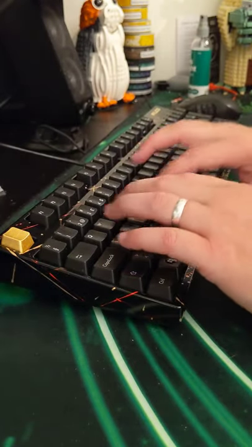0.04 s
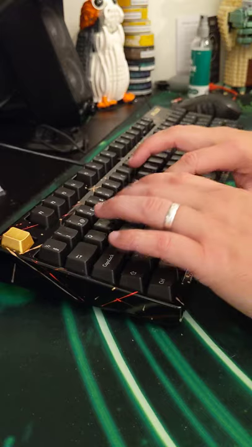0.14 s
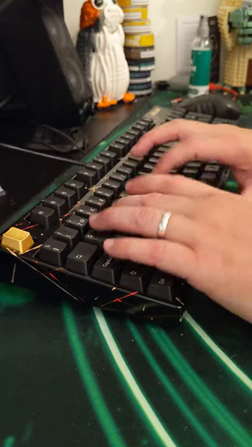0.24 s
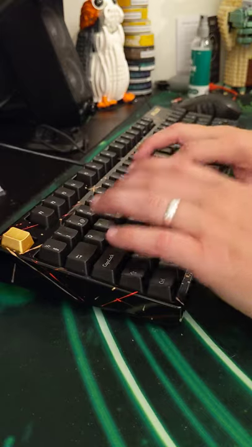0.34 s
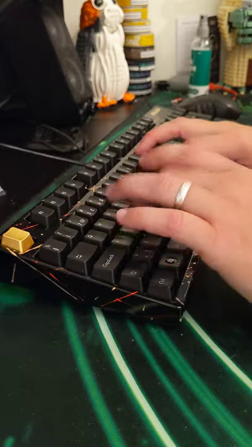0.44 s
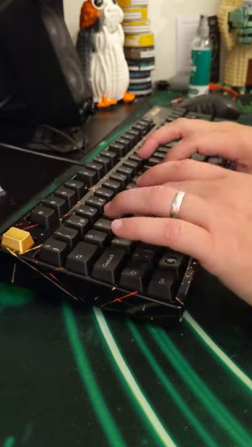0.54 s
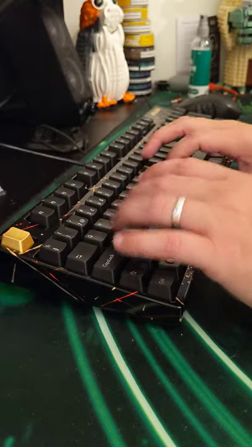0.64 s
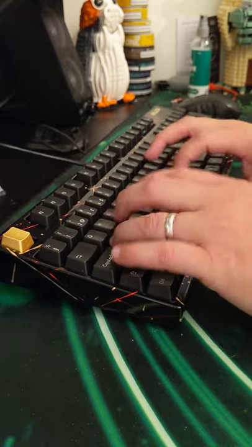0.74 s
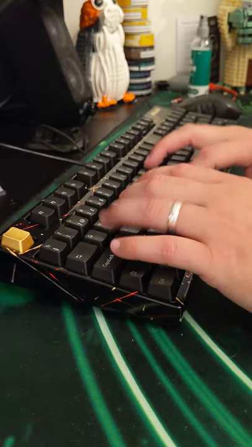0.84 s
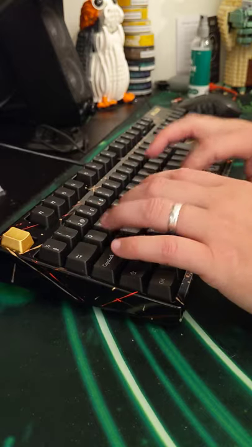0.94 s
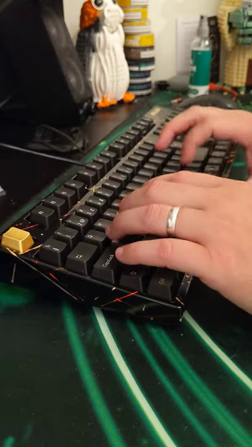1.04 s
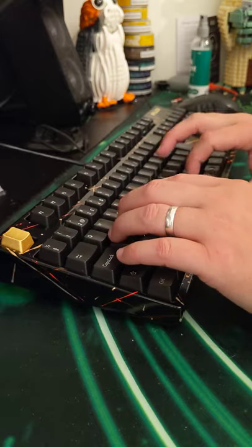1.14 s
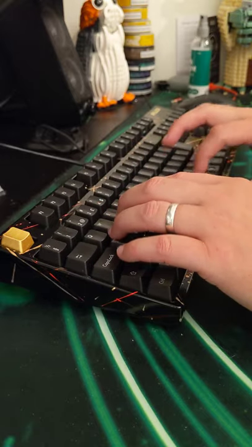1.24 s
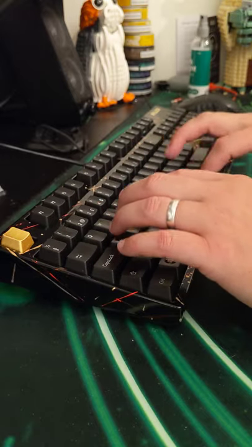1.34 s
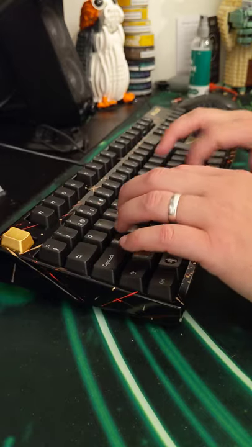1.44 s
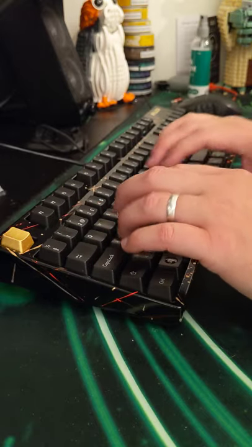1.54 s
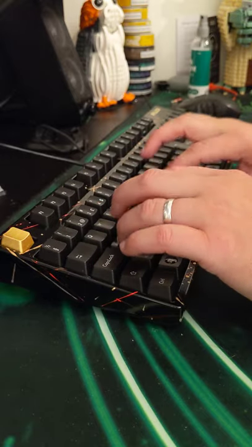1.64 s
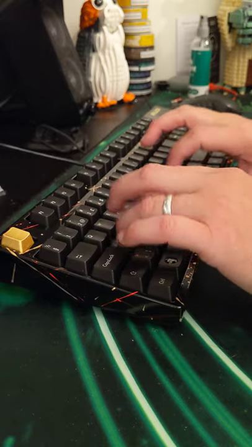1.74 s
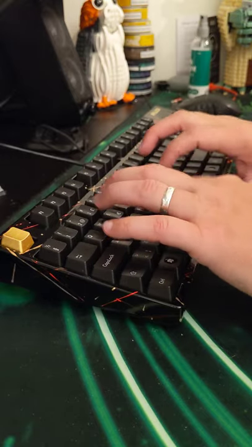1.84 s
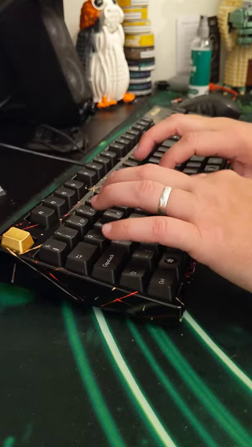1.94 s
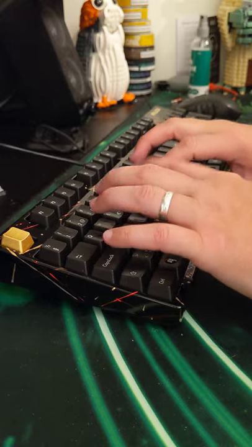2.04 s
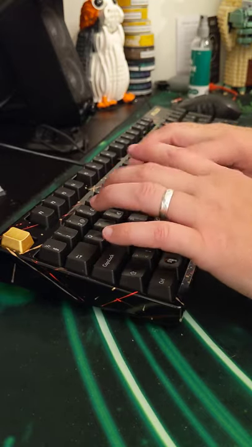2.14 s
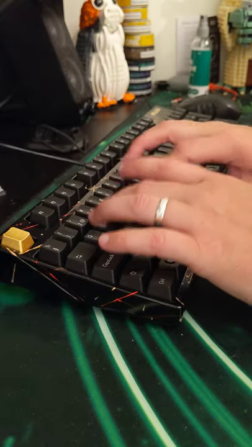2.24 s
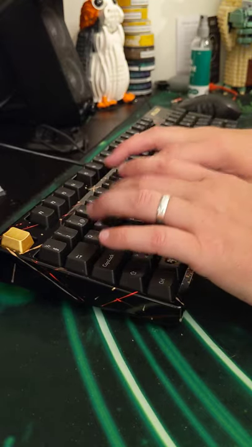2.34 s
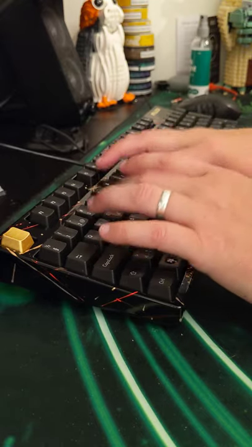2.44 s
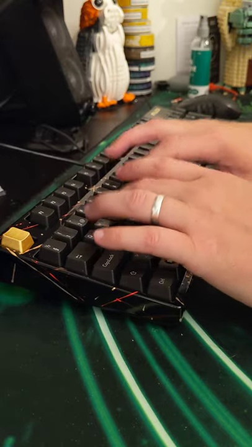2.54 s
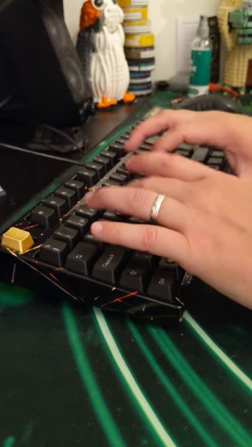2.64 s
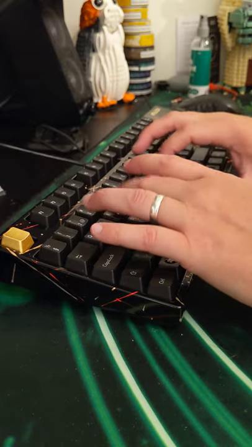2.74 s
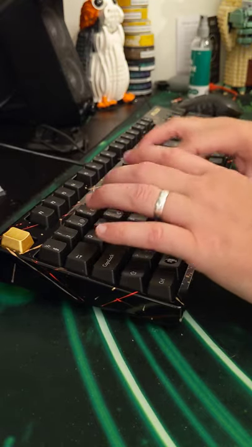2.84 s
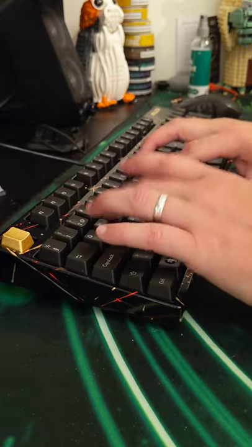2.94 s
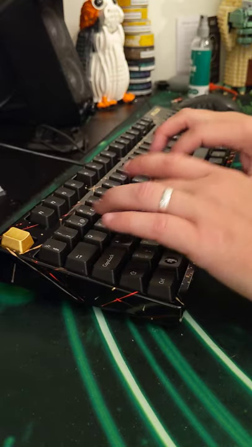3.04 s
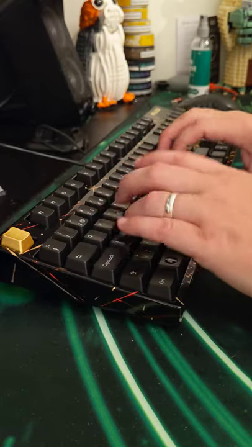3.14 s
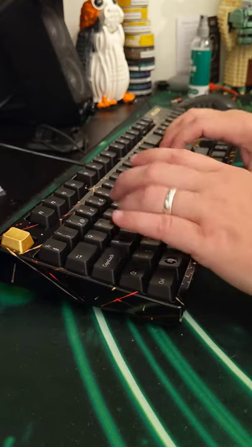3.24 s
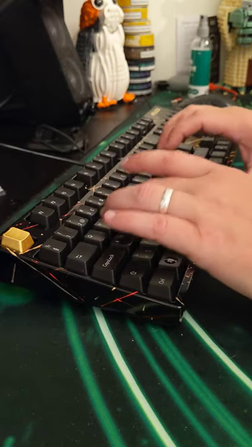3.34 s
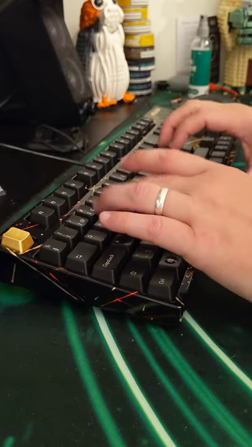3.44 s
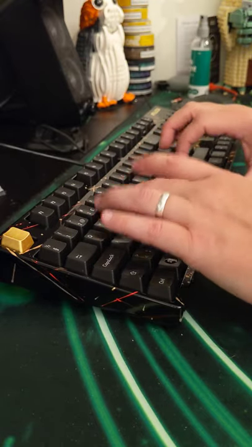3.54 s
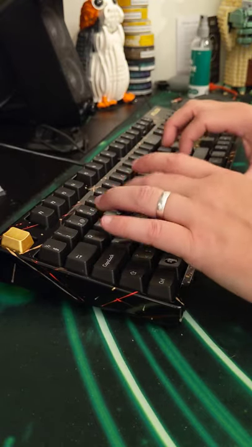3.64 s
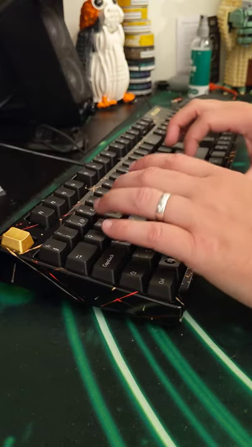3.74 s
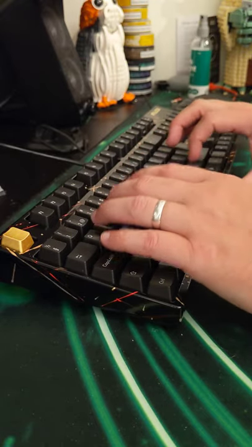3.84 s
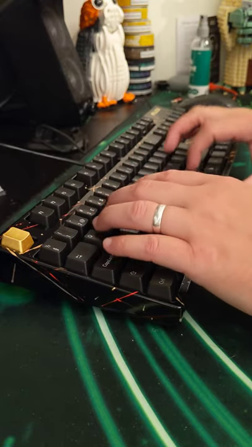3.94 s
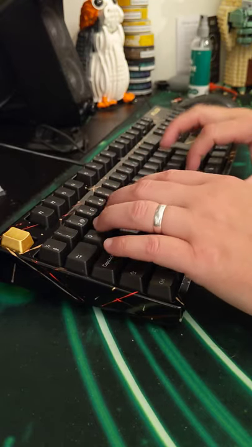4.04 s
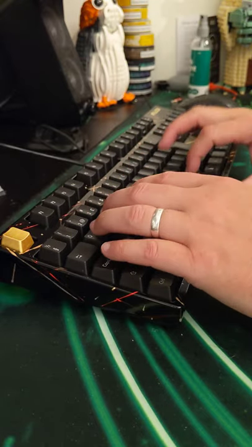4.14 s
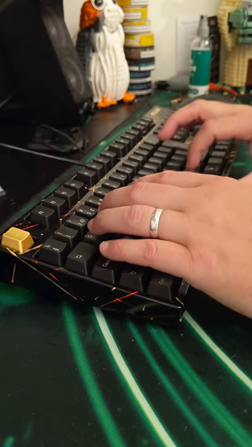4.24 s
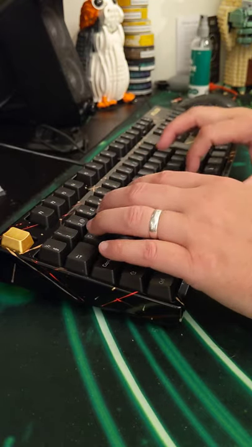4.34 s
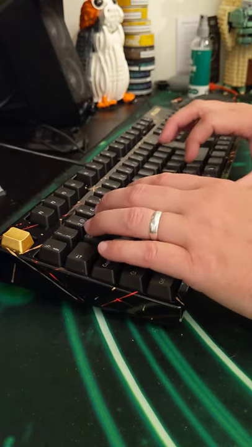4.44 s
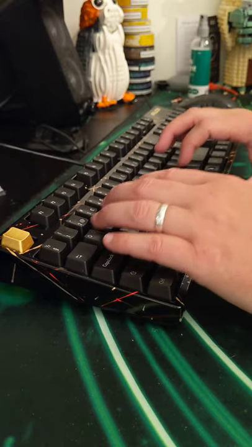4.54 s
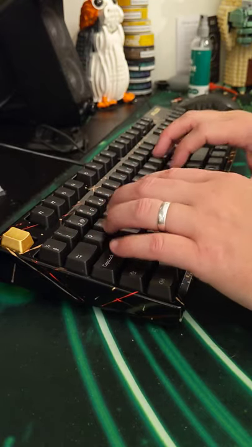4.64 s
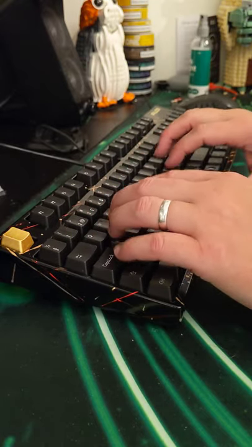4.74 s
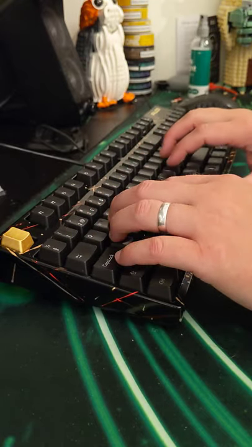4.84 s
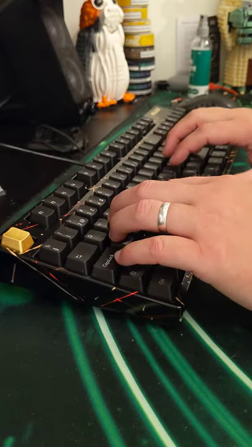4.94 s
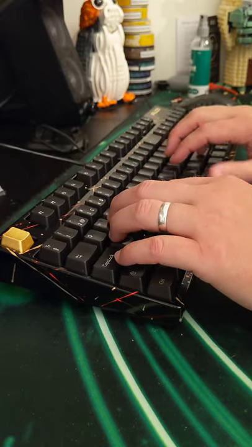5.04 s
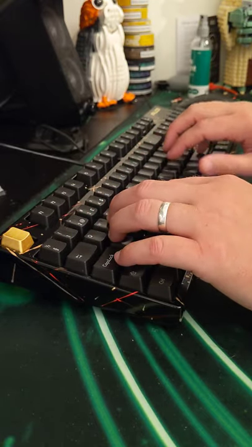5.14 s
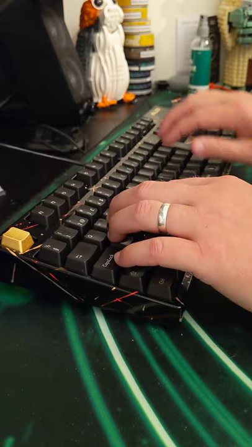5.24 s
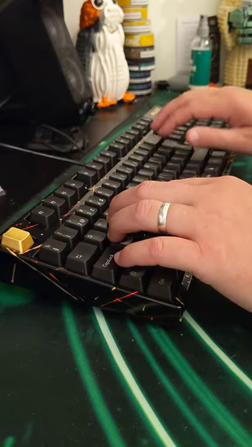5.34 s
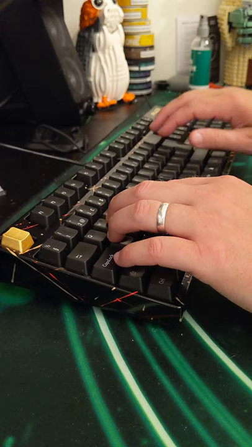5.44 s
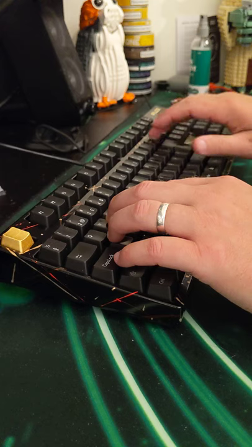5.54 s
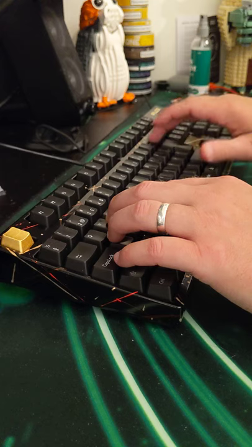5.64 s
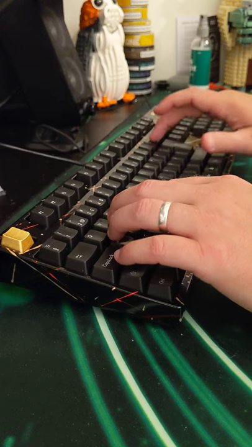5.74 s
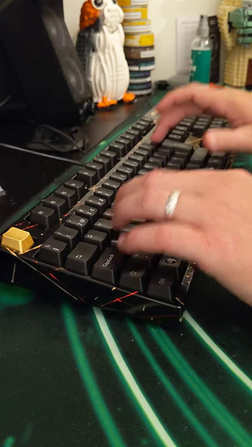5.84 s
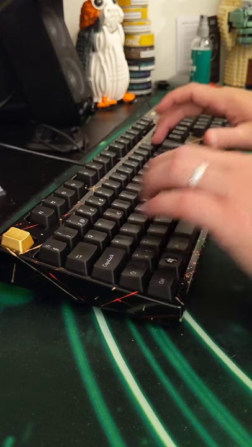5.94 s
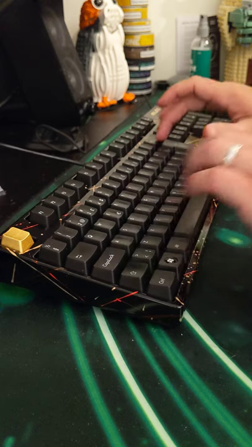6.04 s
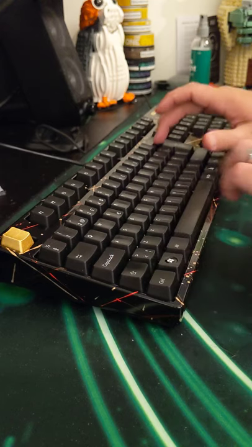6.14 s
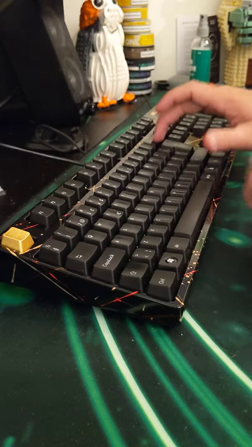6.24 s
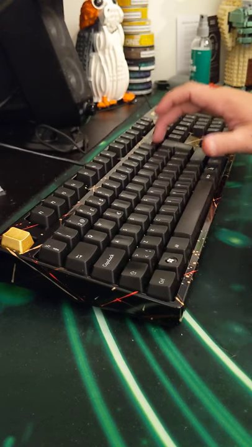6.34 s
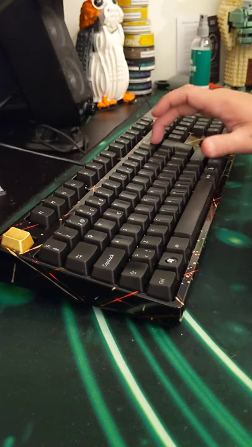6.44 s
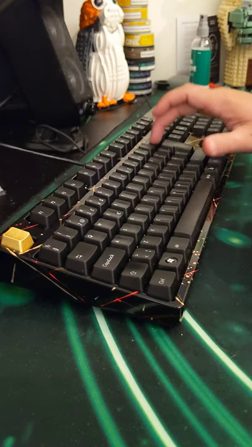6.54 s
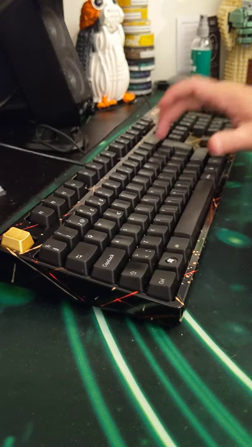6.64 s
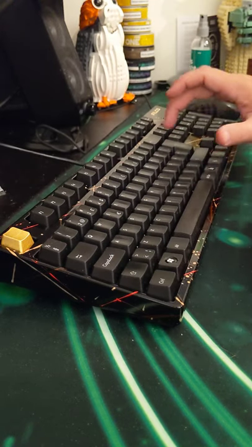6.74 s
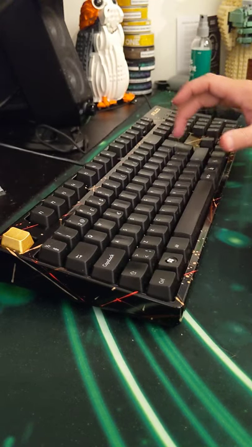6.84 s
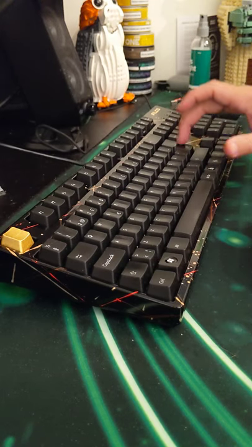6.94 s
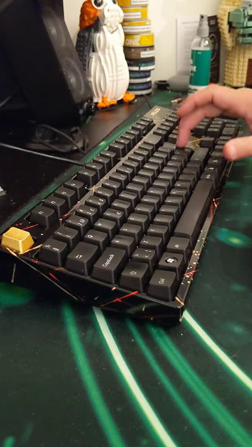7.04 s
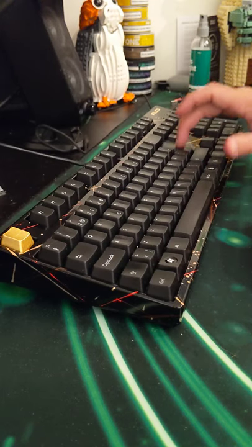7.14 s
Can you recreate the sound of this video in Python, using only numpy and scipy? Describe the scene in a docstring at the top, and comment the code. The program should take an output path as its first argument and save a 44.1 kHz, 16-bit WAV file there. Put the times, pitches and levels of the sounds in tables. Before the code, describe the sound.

A mechanical keyboard on a desk is typed close to a stereo microphone in a small room. From about 0.2 s crisp plastic clacks follow each other quickly and unevenly, presses and lighter spring-back clicks alternating. The space bar strikes lower and heavily at 1.4-1.5 s, again strongest around 2.1 s. Dense bursts fill 1.7-3.8 s, with bright cap rings, faint fingertip brushing, small nail ticks and low desk thumps. From 4.1 to 4.5 s only a soft bump and three separate key releases over cushioned presses, then two softer space-bar contacts near 4.6 s. A quiet second follows, with low rumble, faint hiss and hum. A light bump at 5.7 s leads to four spaced presses of a large far key, at 5.9, 6.1, 6.4 and 6.7 s, dull and deep, each with a quick return, the last loudest. Near silence ends it, with one barely audible touch at 7.1 s.

```python
"""Fast typing on a mechanical keyboard

The keyboard stands on a desk, close to a stereo microphone in a small room. Each key contact is a noise burst
that excites the resonances of board, plate, case, keycap and switch, in shares set by its force and snap.
The space bar and a large key at the far end sound deeper, and contacts ring the desk top as a low thump.
Fingertips brush the caps as filtered noise and nails tick; beneath lie rumble, hiss, hum and a fading ring."""
import sys
import numpy as np
from scipy import signal
from scipy.fft import rfft, irfft, next_fast_len
from scipy.io import wavfile
from scipy.ndimage import map_coordinates

SR = 44100
rng = np.random.default_rng(int(sys.argv[2]) if len(sys.argv) > 2 else 0)


def output_pcm(signal):
    """Save a mono or channel-first signal as 16-bit PCM at the path in sys.argv[1].

    Samples are clipped to [-1, 1] before scaling.
    """
    pcm = np.clip(np.atleast_2d(signal).T, -1, 1) * 32767
    wavfile.write(sys.argv[1], SR, np.round(pcm).astype(np.int16))


N = 316638  # samples in the scene
LENGTH = 16384  # samples in one hit
LEAD_S = .012  # time within a contact before it lands
TIME = np.arange(LENGTH) / SR
HZ = np.fft.rfftfreq(LENGTH, 1 / SR)

# small-key contacts, mostly letter presses, with faint finger touches, the last two on the far key;
# snap is high if crisp and low if cushioned: start_s, force_db, snap_db, keycap_ring_db
SMALL_CONTACTS = [(0.1707, -16, 4, -12), (0.1953, 1, -1.5, 2), (0.3137, 2.5, -1.5, -2), (.454, 0.5, -6, 0),
                  (0.564, -4.5, 2.5, -2.5), (0.5986, 3.5, 0.5, 2.5), (.814, 3.5, -1.5, 3),
                  (0.9613, 4, -5, -7), (1.204, -10, 1.5, -6), (1.2338, 2, -8.5, -2), (1.6951, -13, 0.5, -5),
                  (1.7254, -8, -4, -1.5), (1.7831, 0.5, -4.5, -1.5), (1.8197, -1.5, 5, 0),
                  (1.8731, 5.5, 3.5, 2.5), (1.978, 3, -6, 1), (2.0805, -1.5, -0.5, -1), (2.2608, 1, -2, 0),
                  (2.3328, -9, -8, -6), (2.3654, 0.5, -1.5, 1), (2.444, 2.5, 4.5, 7.5), (2.507, 3, 1, 6.5),
                  (2.5725, -18, 9, 7), (2.6055, -2, -3.5, -3.5), (2.7769, -1, -3.5, 5.5),
                  (2.8603, -1, 2, 1.5), (2.981, -2, -0.5, -7), (3.0702, -1.5, -4.5, -1.5),
                  (3.1008, -7.5, 4, 3), (3.259, -7, -6, -6.5), (3.4366, -14.5, 6.5, 3.5),
                  (3.4617, -0.5, -2.5, 1.5), (3.6391, -7, 9, 5), (3.6532, 1.5, -4.5, 2.5),
                  (3.7536, -4.5, 1, 4), (4.067, -24, 6, 0), (6.32, -27, 4, -15), (7.09, -25.5, 0, -8)]
# space bar contacts: start_s, force_db, snap_db
BAR_CONTACTS = [(1.4296, 11, -3.5), (1.5215, 5, -0.5), (2.1195, 7.5, -5), (2.1285, 11, -3.5),
                (2.2266, -1.5, 6), (2.9558, -0.5, 6), (4.5877, -1, -8), (4.6674, -1.5, 3)]
# large far key, pressed and let go: start_s, force_db, held_s, return_force_db
FAR_PRESSES = [(5.893, -7, 0.08, -7), (6.0562, 0, 0.087, -13.5), (6.3855, 1, .0955, -20),
               (6.658, 8, 0.087, 2)]
# low knock of the board: frequency_hz, relative_db
KNOCK_SPECTRUM = [(110, -13), (170, -12), (208, 9), (270, -1), (340, 0), (480, -7), (620, -3.5), (850, -42)]
# plate: frequency_hz, relative_db
PLATE_SPECTRUM = [(450, -19.5), (660, -8), (820, 0), (930, -5.5), (1050, -5.5), (1300, -20.5)]
# switch click: frequency_hz, relative_db
CLICK_SPECTRUM = [(3600, -7), (4600, -7), (5550, -1.5), (6500, -9), (8200, -5.5), (8600, -13.5),
                  (9450, -3.5), (10400, -17.5), (11700, -14.5), (12800, -18.5), (15500, -22)]
# case under the space bar: frequency_hz, relative_db
BAR_CASE_SPECTRUM = [(850, -30), (1250, -2.5), (1520, 2.5), (1780, -1), (1950, -7.5), (2300, -1.5),
                     (2650, -3.5), (3200, -65)]
# long keycap: frequency_hz, relative_db
LONG_CAP_SPECTRUM = [(1700, -15), (2300, -19), (2800, 2.5), (3250, 4.5), (3550, -0.5), (4300, -6),
                     (5000, -17), (6000, -27.5)]


def amp(db):
    """Decibels express amplitude ratios on a logarithmic scale; return the gain."""
    return 10 ** (np.asarray(db) / 20)


def unit(x):
    """Root-mean-square normalization: scale to rms 1."""
    return x / np.sqrt(np.mean(x ** 2) + 1e-20)


def along(points, hz):
    """Logarithmic frequency scale: interpolate (frequency, value) points along it."""
    frequencies, values = np.transpose(points)
    return np.interp(np.log(hz + 1), np.log(frequencies + 1), values)


def shape(points, hz):
    """Band-limited radiation: a spectrum in dB that falls 40 dB per octave beyond its end points."""
    nearest = np.clip(hz + 1, points[0][0], points[-1][0])
    octaves = np.log2((hz + 1) / nearest)
    return along(points, hz) - 40 * np.abs(octaves)


def causal(db):
    """Minimum phase: a response with this gain that rings only after the blow."""
    cepstrum = irfft(np.log(np.maximum(amp(db), 1e-5)))
    # fold the negative-time half onto the positive one
    cepstrum[1:LENGTH // 2] *= 2
    cepstrum[LENGTH // 2 + 1:] = 0
    return np.exp(rfft(cepstrum))


def stereo(pair, hz):
    """Interchannel coherence: mix two unrelated spectra into left and right, alike in the bass."""
    # left-right correlation: frequency_hz, correlation
    coherence = [(30, 0.97), (70, 1), (130, 0.82), (300, 0.091), (700, 0.11), (1400, 0.38), (3100, 0.037),
                 (7000, 0.022)]
    angle = np.arccos(np.clip(along(coherence, hz), -1, 1)) / 2
    mid = pair[0] * np.cos(angle)
    side = pair[1] * np.sin(angle)
    return np.array([mid + side, mid - side])


def wobble(rate):
    """Slow random modulation: a smooth curve through random knots, rate of them a second."""
    knots = rng.standard_normal(int(N * rate / SR) + 4)
    return map_coordinates(knots, [np.arange(N) * rate / SR])


def steady(spectrum):
    """Stationary coloured noise: stereo, with this spectrum and rms 1."""
    size = next_fast_len(N)
    hz = np.fft.rfftfreq(size, 1 / SR)
    pair = rfft(rng.standard_normal((2, size)))
    coloured = stereo(pair, hz) * amp(along(spectrum, hz))
    return unit(irfft(coloured, size)[:, :N])


def add(track, s, sound):
    """Superposition: mix a sound into the track at s seconds."""
    start = max(round(s * SR), 0)
    track[:, start:start + LENGTH] += sound[:, :N - start]


def background(air_db=-71.0, rumble_db=-59, waver_db=2.5, drift=0.53):
    """Stationary noise and wavering tones: room rumble, hiss, mains hum, a high tone and a fading ring."""
    # room and microphone hiss: frequency_hz, relative_db_per_hz
    air = [(100, -30), (190, -3), (260, -2), (400, -9), (700, -14), (2000, -18), (4000, -15), (6500, -15.5),
           (10000, -19), (12500, -23), (16000, -25)]
    # low room rumble: frequency_hz, relative_db_per_hz
    rumble = [(12, -16), (22, -1), (35, 0), (52, -2), (65, 4), (78, -4), (115, -8), (135, -6), (160, -15),
              (185, -25), (300, -50)]
    # hum and high tone, before the level wavers: frequency_hz, level_db
    hum_tones = [(100, -66), (13679, -100)]
    # faint fading tones, with the level at the start: frequency_hz, level_db, t60_s
    ring_tones = [(310, -65, 0.94), (463, -70, 0.73), (774, -77, .3), (1039, -68, 0.12), (1390, -79, .25)]
    t = np.arange(N) / SR
    tones = 0
    for hz, db in hum_tones:
        level = amp(db + waver_db * wobble(3.01))
        tones = tones + level * unit(np.sin(2 * np.pi * hz * t + drift * wobble(3.65)))  # drift in radians
    for hz, db, t60 in ring_tones:
        decay = amp(db - 60 * t / t60)
        tones = tones + decay * unit(np.sin(2 * np.pi * hz * t + 0.85 * wobble(55)))
    return amp(air_db) * steady(air) + amp(rumble_db) * steady(rumble) + tones


def contact(chatter_t60=0.037, spiky=0.49, rise_s=0.0003, touch_db=-21, touch_t60=0.065,
            wall_s=.008, wall_scatter=0.2, wall_db=-4, wall_t60=0.065,
            rattle_within_s=0.022, rattle_db=-5, rattle_t60=0.005, room_db=-6, build_s=0.0063):
    """Impact excitation: the stem slides, lands with chatter, the cap rattles once, wall and room answer."""
    # reverberation: frequency_hz, t60_s
    reverberation = [(200, 0.34), (800, 0.16), (1500, 0.22), (3100, 0.27), (6000, 0.37), (14000, 0.3)]
    spikes = unit(rng.standard_normal((2, LENGTH)) * np.exp(spiky * rng.standard_normal(LENGTH)))
    since = np.maximum(TIME - LEAD_S, 0)
    wall_delay_s = wall_s * (1 + wall_scatter * rng.uniform(-1, 1))  # the path differs between contacts
    late = np.maximum(since - wall_delay_s, 0)
    loose = np.maximum(since - rattle_within_s * rng.uniform(), 0)

    touch = amp(touch_db - 60 * np.abs(TIME - LEAD_S) / touch_t60)  # the slide swells before the landing
    chatter = (1 - np.exp(-since / rise_s)) * amp(-60 * since / chatter_t60)
    rattle = (loose > 0) * amp(rattle_db - 60 * loose / rattle_t60)
    wall = (late > 0) * amp(wall_db - 60 * late / wall_t60)
    envelope = np.sqrt(touch ** 2 + chatter ** 2 + rattle ** 2 + wall ** 2)  # energies add

    # noise that decays at its own rate in each frequency band
    hz, t, bands = signal.stft(rng.standard_normal((2, LENGTH)), SR, nperseg=256)
    decay = amp(-60 * (t - LEAD_S) / along(reverberation, hz)[:, None])
    tail = signal.istft(bands * decay, SR, nperseg=256)[1][:, :LENGTH]
    room = amp(room_db) * (1 - np.exp(-since / build_s)) * tail
    return stereo(rfft(spikes * envelope + room), HZ)


def own_colour(spacing_hz=130, low_db=1.5, high_db=3):
    """Modal irregularity: every contact has small random resonances, strongest in the treble."""
    ripple = map_coordinates(rng.standard_normal(LENGTH // 16), [HZ / spacing_hz], mode="mirror")
    return ripple * along([(1000, low_db), (6000, high_db)], HZ)


def opening(x):
    """Onset normalization: scale a hit so that the 25 ms after its lead-in have rms 1."""
    onset = x[:, round(LEAD_S * SR):][:, :SR // 40]
    return x / np.sqrt(np.mean(onset ** 2))


def stroke(mix, force_db, snap_db, spectra, left_db=.5):
    """Source-filter principle: one contact excites every part, at levels following force and snap."""
    # narrow resonances of the board, shared by all keys: frequency_hz, width_hz, lift_db
    board = [(644, 32, 5.5), (832, 120, 5.5), (1038, 27, 1.5), (1237, 104, 5), (1453, 16, 5.5),
             (1520, 38, 4), (1776, 29, 7.5), (2159, 33, 1), (2276, 25, 7.5), (2667, 75, 7), (2960, 61, 4),
             (3140, 36, 5), (3460, 37, 4.5)]
    # stereo balance, to which left_db is added: frequency_hz, left_over_right_db
    balance = [(100, -6), (200, 6.5), (380, -6), (650, 3.5), (1300, 1), (2400, -1), (4400, -2.5),
               (8100, 1.5), (10500, -0.5), (13000, -5.5)]
    blow = contact() * amp(np.outer([.5, -.5], along(balance, HZ) + left_db))
    colour_db = own_colour()
    for hz, width, lift in board:
        colour_db = colour_db + lift / (1 + (2 * (HZ - hz) / width) ** 2)
    levels_db = np.array(mix) @ [1, force_db, snap_db]
    sounds = []
    for db, part in zip(levels_db, spectra):
        ringing = irfft(blow * causal(part + colour_db))
        sounds.append(amp(db) * opening(ringing))
    return np.array(sounds)


def small_parts(case_spread=0.014, keycap_spread=0.015, keycap_pitch=0.98):
    """Frequency scaling: knock, plate, case, cap and click; case and cap pitch vary between contacts."""
    # case: frequency_hz before scaling, relative_db
    case_spectrum = [(850, -12), (1200, -0.5), (1500, 4), (1780, 2.5), (1950, -3), (2300, -1.5),
                     (2650, -1.5), (3200, -21)]
    # small keycap: frequency_hz before scaling, relative_db
    keycap_spectrum = [(2300, -41.5), (2720, -11.5), (2980, 2), (3140, 3.5), (3300, 5.5), (3500, -4),
                       (3900, -13.5), (4500, -22), (5500, -56.5)]
    case, keycap = np.exp(rng.standard_normal(2) * [case_spread, keycap_spread])
    return [shape(KNOCK_SPECTRUM, HZ), shape(PLATE_SPECTRUM, HZ), shape(case_spectrum, HZ / case),
            shape(keycap_spectrum, HZ / (keycap * keycap_pitch)), shape(CLICK_SPECTRUM, HZ)]


def small_keys(blows, mix):
    """Modal excitation: each blow sounds the small-key parts, with a keycap ring of varying strength."""
    track = np.zeros((2, N))
    for s, force_db, snap_db, ring_db in blows:
        knock, plate, case, keycap, click = stroke(mix, force_db, snap_db, small_parts())
        add(track, s - LEAD_S, knock + plate + case + amp(ring_db) * keycap + click)
    return track


def small_contacts():
    """Impact excitation: small-key contacts, mostly letter presses, with a few faint finger touches."""
    # knock, plate, case, keycap, click: level_db at normal force, db_per_db_force, db_per_db_snap
    mix = [(-60, 0.64, 0.17), (-56, 0.86, 0.59), (-47.5, 1, 0), (-46, 1, 0), (-53, 1, 1)]
    return small_keys(SMALL_CONTACTS, mix)


def thump(t60):
    """Modal response of a plate: a soft push rings the desk top."""
    # desk top: frequency_hz, relative_db
    desk_spectrum = [(30, -5.5), (50, 4.5), (76, -12.5), (105, 0), (143, 1), (175, -19), (208, -4.5),
                     (250, -20), (300, -19.5)]
    push = rng.standard_normal((2, LENGTH)) * amp(-60 * TIME / t60)
    boom = irfft(stereo(rfft(push), HZ) * causal(shape(desk_spectrum, HZ)))
    return boom / np.sqrt(np.sum(boom ** 2) / (SR / 20))  # the same energy for every thump


def desk(small_db=-55, bar_db=-55, far_db=-48.5, per_force=0.71, per_snap=0.75,
         heavy_t60=0.15, small_t60=.17):
    """Structure-borne sound: contacts push the desk, more when forceful and, on small keys, cushioned."""
    # fingers pressing so softly that only the desk answers: start_s, level_db
    soft_presses = [(4.093, -47.5), (4.255, -47), (4.4, -46)]
    track = np.zeros((2, N))
    for s, force_db, snap_db, _ in SMALL_CONTACTS:
        level_db = small_db + per_force * force_db - per_snap * snap_db
        add(track, s, amp(level_db) * thump(small_t60))
    for contacts, normal_db in (BAR_CONTACTS, bar_db), (FAR_PRESSES, far_db):
        for s, force_db, *_ in contacts:
            add(track, s, amp(normal_db + per_force * force_db) * thump(heavy_t60))
    for s, db in soft_presses:
        add(track, s, amp(db) * thump(heavy_t60))
    return track


def fingers(level_db=-1, uneven_db=3, rise_db_per_s=400, fall_db_per_s=88):
    """Friction noise: fingertips brush the caps in spells that set in quickly and die away."""
    # fingers sliding over the keycaps: start_s, end_s, relative_db
    brushes = [(.2, 3.8, -70), (5.69, 6.6, -71), (7.08, 7.13, -73)]
    # friction noise: frequency_hz, relative_db
    friction = [(600, 5), (1400, -4), (3100, 3), (4500, -1.5), (5600, -0.5), (7000, -26), (9600, -1),
                (15000, -38)]
    t = np.arange(N) / SR
    spells = 0
    for start, end, db in brushes:
        before_db = rise_db_per_s * np.maximum(start - t, 0)
        after_db = fall_db_per_s * np.maximum(t - end, 0)
        spells = spells + amp(db - before_db - after_db)
    return spells * amp(level_db + uneven_db * wobble(49)) * steady(friction)


def letter_returns():
    """Elastic recoil: letter keys spring back, which leaves the desk still."""
    # letter keys springing back: start_s, force_db, snap_db, keycap_ring_db
    blows = [(.4146, 3, 2.5, 5.5), (.717, 0.5, 3.5, 3.5), (.9141, -1, 3, 2.5), (1.047, -.5, -0.5, .5),
             (1.3273, -1, -2.5, -0.5), (2.6773, -1, 3.5, 5), (3.1734, -0.5, 1.5, 4), (3.3373, 2, -2.5, 1.5),
             (3.5578, 1.5, 3, 3), (4.1719, 2.5, -0.5, -5), (4.3303, 1.5, -0.5, -2.5),
             (4.491, 2.5, 0.5, -4.5)]
    # knock, plate, case, keycap, click: level_db at normal force, db_per_db_force, db_per_db_snap
    mix = [(-64, 0.5, 0.5), (-53.5, 1.05, .5), (-47, 0.78, 0), (-47, 1, 0), (-53, 0.9, 1)]
    return small_keys(blows, mix)


def clacks(blows, mix, spectra):
    """Modal excitation: blows (start_s, force_db, snap_db) strike parts with resonances of their own."""
    track = np.zeros((2, N))
    for s, force_db, snap_db in blows:
        sounds = stroke(mix, force_db, snap_db, [shape(part, HZ) for part in spectra])
        add(track, s - LEAD_S, sounds.sum(axis=0))
    return track


def space_bar():
    """Size and pitch: the long bar clacks lower than the small keys."""
    # knock under the bar: frequency_hz, relative_db
    bar_knock = [(110, -18), (205, -0.5), (265, -3.5), (345, 2), (420, -1), (500, -1.5), (620, -7),
                 (850, -39.5)]
    # knock, plate, case, keycap, click: level_db at normal force, db_per_db_force, db_per_db_snap
    mix = [(-53, 0.47, 0.047), (-54.5, 0.074, 1.18), (-47, 0.8, 0.13), (-58, 0.99, 0.39), (-66.5, 1.8, 1.1)]
    spectra = [bar_knock, PLATE_SPECTRUM, BAR_CASE_SPECTRUM, LONG_CAP_SPECTRUM, CLICK_SPECTRUM]
    return clacks(BAR_CONTACTS, mix, spectra)


def nails(t60=0.012, room_db=-24, room_t60=0.18):
    """Short hard impact: a nail meets a cap with a very short, bright snap and a faint room tail."""
    # dry fingernail ticks on the caps: start_s, relative_db
    ticks = [(1.433, -43), (1.873, -53), (2.4445, -50), (3.557, -55), (4.116, -41), (5.6835, -55)]
    # nail on cap: frequency_hz, relative_db
    nail_spectrum = [(900, -16), (2500, -8), (4200, 8), (6500, -4), (10000, -12), (15500, -3)]
    track = np.zeros((2, N))
    for s, db in ticks:
        envelope = amp(-60 * TIME / t60) + amp(room_db - 60 * TIME / room_t60)
        snap = rng.standard_normal((2, LENGTH)) * envelope
        add(track, s, amp(db) * irfft(rfft(snap) * causal(shape(nail_spectrum, HZ))))
    return track


def bumps():
    """Low-frequency excitation: a finger bumps the board, mostly as low knock, without pressing a key."""
    # bumps: start_s, force_db
    blows = [(4.115, 3), (5.682, -4)]
    # knock, plate, case, keycap, click: level_db at normal force, db_per_db_force, db_per_db_snap
    mix = [(-56, 0.51, 0), (-62, 0.88, 0), (-68, 1, 0), (-70, 0.85, 0), (-68, 1, 0)]
    spectra = [KNOCK_SPECTRUM, PLATE_SPECTRUM, BAR_CASE_SPECTRUM, LONG_CAP_SPECTRUM, CLICK_SPECTRUM]
    return clacks([(s, force_db, 0) for s, force_db in blows], mix, spectra)


def far_key(return_snap_db=5.5):
    """Elastic recoil: each press lands dully; after the hold the spring throws the key back more crisply."""
    # plate at the far end: frequency_hz, relative_db
    far_plate = [(430, -9), (580, -10.5), (660, 1.5), (800, -9.5), (930, 1), (1050, 3), (1300, -17.5)]
    # case at the far end: frequency_hz, relative_db
    far_case = [(850, -16), (1100, -4), (1270, -4), (1400, -6), (1600, -8.5), (1950, -18), (2500, -12.5),
                (3200, -26)]
    # knock, plate, case, keycap, click: level_db at normal force, db_per_db_force, db_per_db_snap
    mix = [(-67.5, 0.83, 0.2), (-51, 0.55, -0.9), (-48.5, 1.09, -0.081), (-62.5, 1.4, -0.07),
           (-69.5, .9, 1.15)]
    presses = [(s, force_db, 0) for s, force_db, _, _ in FAR_PRESSES]
    returns = [(s + held_s, return_db, return_snap_db) for s, _, held_s, return_db in FAR_PRESSES]
    spectra = [KNOCK_SPECTRUM, far_plate, far_case, LONG_CAP_SPECTRUM, CLICK_SPECTRUM]
    return clacks(presses + returns, mix, spectra)


def scene():
    """Linear superposition: keys, hands, desk and room sound together."""
    keys = small_contacts() + letter_returns() + space_bar() + far_key()
    hands = fingers() + nails() + bumps()
    return background() + keys + hands + desk()


def record(dry, top_hz=15800):
    """Band limitation: the recorder keeps nothing above top_hz."""
    size = next_fast_len(N + LENGTH)
    passband = np.fft.rfftfreq(size, 1 / SR) < top_hz
    return irfft(rfft(dry, size) * passband, size)[:, :N]


dry = scene()
out = record(dry)
output_pcm(out)
```